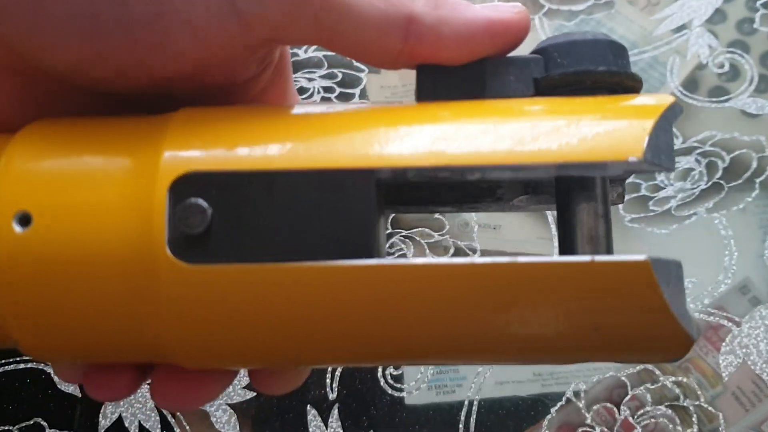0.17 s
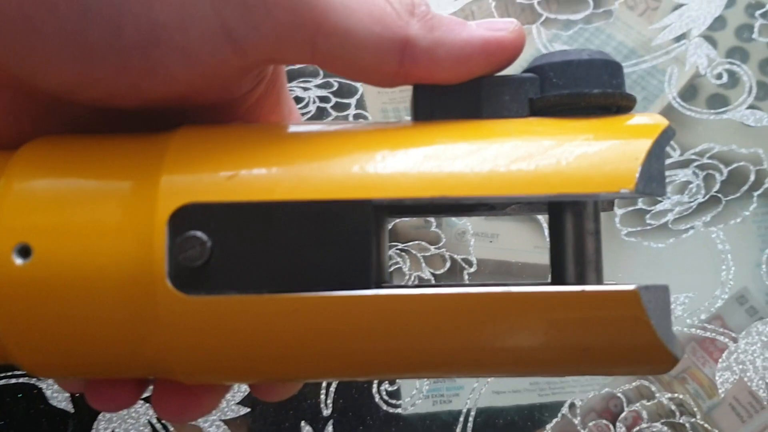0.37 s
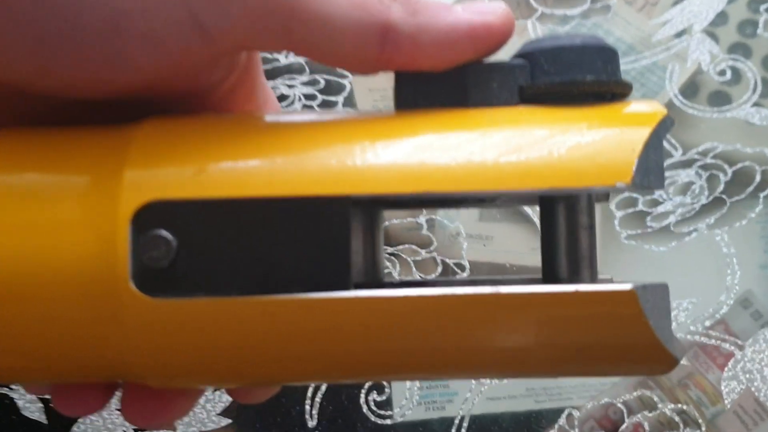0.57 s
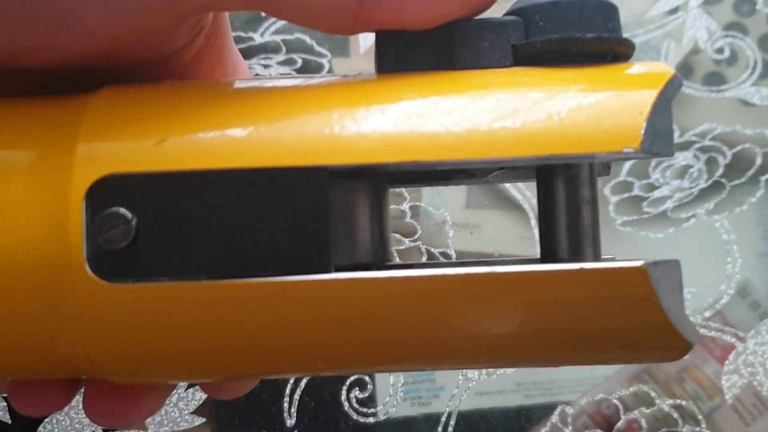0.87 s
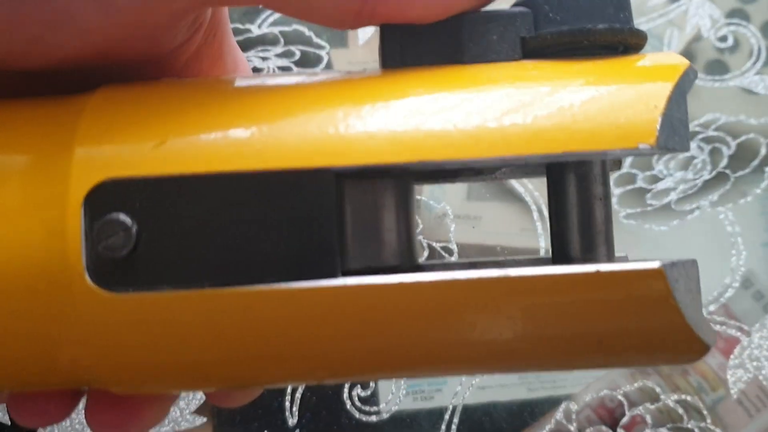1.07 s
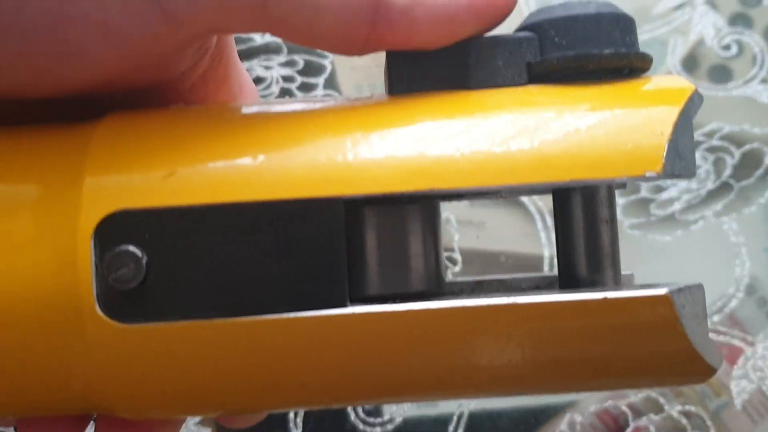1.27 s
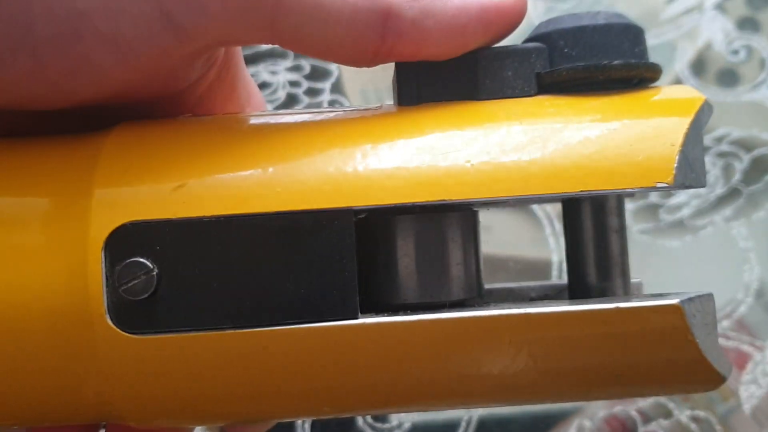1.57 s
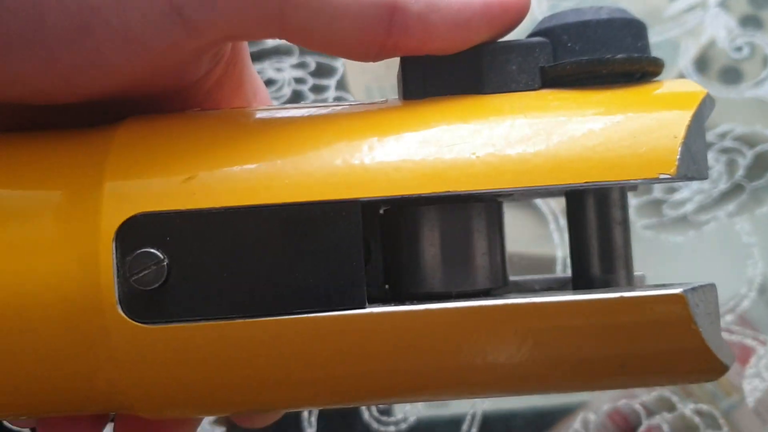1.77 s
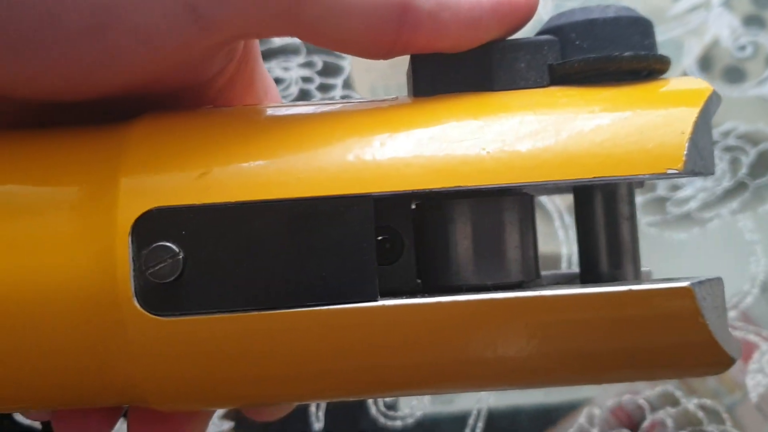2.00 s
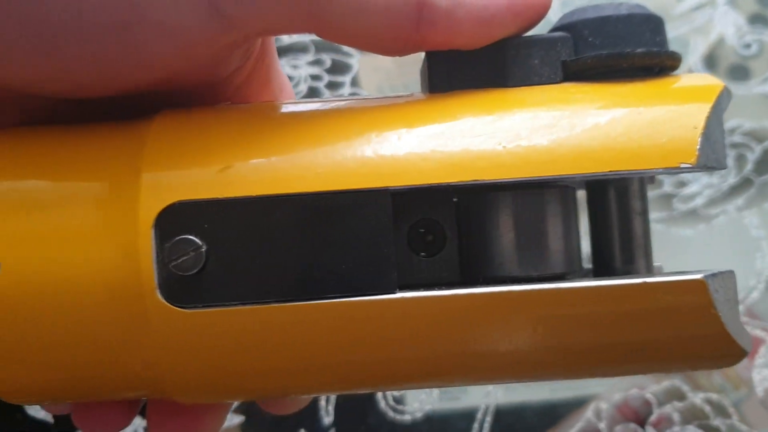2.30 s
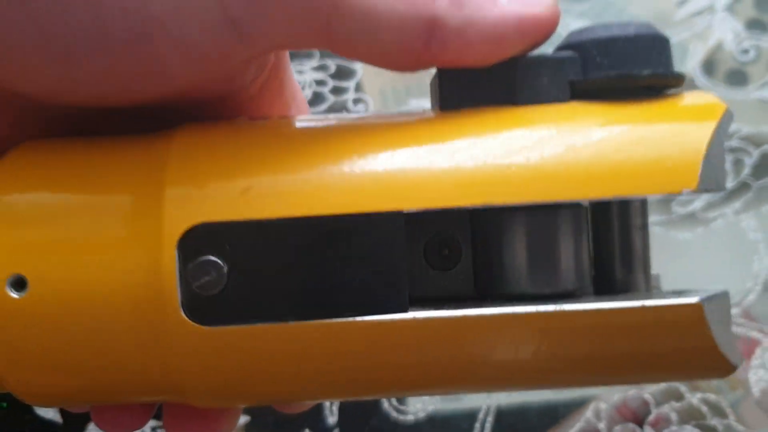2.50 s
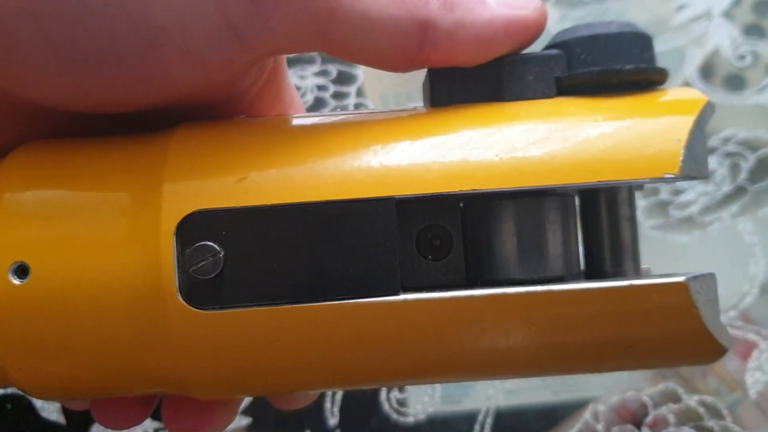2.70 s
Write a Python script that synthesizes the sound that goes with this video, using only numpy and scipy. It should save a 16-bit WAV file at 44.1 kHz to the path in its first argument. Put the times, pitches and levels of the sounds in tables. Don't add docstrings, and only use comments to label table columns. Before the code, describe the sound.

Close to the right microphone, a geared electric tool motor grinds up to speed and whines steadily over harsh rattle and fan hiss, then squeals down sharply; soft scraping and ticking follow. The left side is duller.

```python
import sys
import numpy as np
from scipy import signal
from scipy.fft import rfft, irfft, next_fast_len
from scipy.io import wavfile
from scipy.ndimage import uniform_filter1d, map_coordinates

SR = 44100
rng = np.random.default_rng(int(sys.argv[2]) if len(sys.argv) > 2 else 0)


def invert_db(x):
    u = np.asarray(x, float) / 20
    return 10 ** u


def wrap_up_sound(samples):
    columns = np.atleast_2d(samples).T
    tamed = np.clip(columns, -1, 1)
    steps = np.round(tamed * 32767).astype(np.int16)
    wavfile.write(sys.argv[1], SR, steps)


N = 125685

# (time [s], shaft rate [Hz])
SPIN_UP_HZ = [(.155, 20), (.24, 118), (.322, 207), (.386, 287), (.42, 306)]
RUNNING_HZ = [(.46, 329.5), (.5, 352), (.6, 379.5), (.74, 400), (.9, 414.5), (1.14, 432.5), (1.49, 443.6),
              (1.71, 452.7), (2.22, 463.3), (2.45, 469.3)]
BRAKING_HZ = [(2.462, 461), (2.48, 420.5), (2.51, 334), (2.549, 206.3), (2.599, 40.4)]
# (time [s], level [dB])
EFFORT_DB = [(.15, -87), (.165, -57), (.182, -65), (.187, -40), (.21, -26), (.225, -20), (.26, -18.5),
             (.5, -14), (1.5, -14), (2.47, -14.5), (2.51, -17), (2.55, -24.5), (2.58, -25), (2.597, -42),
             (2.63, -66)]
# (multiple of shaft [-], peak level [dB], resonance [Hz], width [Hz], level elsewhere [dB])
SHAFT_ORDERS = [(1, -44, 455, 60, -56), (22, -30, 7600, 220, -70), (2.545, -28, 815, 55, -42),
                (5.09, -23, 2370, 50, -40), (7.635, -18, 2370, 200, -60), (6.09, -34, 2400, 200, -48),
                (7, -34, 3200, 100, -46), (8, -31, 3700, 50, -42), (12, -30, 4400, 150, -48),
                (14, -34, 5800, 150, -48), (17, -31, 6500, 500, -46), (22, -27.5, 10050, 450, -35),
                (24, -37, 8800, 600, -42), (2.545, -36, 1000, 90, -70), (31, -38, 12700, 1100, -50)]
STEADY_HZ = (455, 1000, 2370, 7600, 8700, 10050)
# (time [s], level [dB])
START_SQUEAL_DB = [(.312, -45), (.328, -15), (.352, -11), (.386, -18), (.405, -22), (.42, -50)]
# (time [s], level [dB])
BRAKE_SQUEAL_DB = [(2.44, -50), (2.46, -19), (2.478, -18.5), (2.51, -14), (2.55, -23), (2.565, -61)]
BRAKE_OVERTONE_DB = [(2.538, -50), (2.549, -21), (2.558, -24), (2.567, -19), (2.576, -50)]
# (centre [Hz], width [Hz], level [dB])
HOUSING_MODES = [(1410, 87, -23), (2310, 260, -8.5), (3220, 263, -4), (3820, 32, -24), (4327, 120, -2.5),
                 (4844, 240, -7), (6030, 1040, -11), (6420, 140, -17), (7360, 110, -19.5)]
# (frequency [Hz], density [dB per Hz])
RATTLE_COLOUR = [(150, -70), (350, -51), (452, -36), (560, -21.5), (900, -10), (2310, -5), (6180, -6),
                 (9300, -18.5), (13000, -18)]
FAN_COLOUR = [(7000, -74), (9200, -9.5), (11500, -6), (13800, 4), (15800, -3)]
RUMBLE_COLOUR = [(18, -40), (30, -19), (70, -5), (140, -6.5), (300, -1), (500, 8.5), (800, -58)]
# (time [s], level [dB])
FAN_BRAKE_DB = [(2.47, 3), (2.55, 8), (2.59, -6)]
# (time [s], level [dB])
GRIND_DB = [(.152, -75), (.162, -55.5), (.185, -33.5), (.22, -30.5), (.25, -22.5), (.31, -24), (.35, -52),
            (.4, -80)]
# (centre [Hz], width [Hz], level [dB])
GRIND_MODES = [(860, 90, -7), (1350, 260, -6), (1950, 150, -5), (2230, 130, 2)]
# (time [s], level [dB])
THUMPS_DB = [(.188, -30), (.2, -27), (.213, -24), (.244, -10), (.263, -6), (.273, -9), (.286, -11),
             (.294, -13), (.303, -7), (.314, -14)]
# (centre [Hz], width [Hz], level [dB])
THUMP_MODES = [(1350, 250, -14), (2230, 110, 0), (2900, 250, -12)]
# (time [s], level [dB])
RETURN_DB = [(2.58, -80), (2.61, -34), (2.64, -31.5), (2.685, -28), (2.74, -29.5), (2.748, -35), (2.8, -37),
             (2.85, -38.5)]
# (frequency [Hz], density [dB per Hz])
RETURN_COLOUR = [(150, -40), (500, -21.5), (1300, -14), (2200, -1), (3700, -11), (6300, -7.5), (9300, -20),
                 (11000, -15.5), (15800, -8.5)]
# (start [s], end [s], from [Hz], to [Hz], level [dB])
WHINES = [(.208, .25, 4900, 8700, -29), (.218, .236, 6200, 6500, -24), (2.675, 2.88, 810, 670, -53),
          (2.655, 2.72, 1380, 1600, -42), (2.6, 2.81, 265, 235, -61), (2.505, 2.6, 880, 860, -37),
          (2.79, 2.9, 900, 900, -59), (2.63, 2.76, 2050, 2400, -39), (2.65, 2.73, 2700, 3250, -44),
          (.159, .172, 2900, 3050, -46), (2.66, 2.75, 4400, 4350, -41), (2.6, 2.66, 3000, 3200, -45)]
# (time [s], shaft rate [Hz])
KICK_HZ = [(2.6, 130), (2.615, 195), (2.635, 290), (2.66, 380), (2.69, 455), (2.72, 478), (2.745, 482)]
# (time [s], level [dB])
KICK_DB = [(2.605, -65), (2.62, -42), (2.655, -42), (2.69, -45), (2.742, -46), (2.747, -80)]
# (multiple of shaft [-], level [dB])
KICK_ORDERS = [(22, 0), (24, -3)]
# (time [s], level [dB])
CREEP_DB = [(2.74, -70), (2.752, -35), (2.8, -34.5), (2.85, -37.5)]
# (frequency [Hz], density [dB per Hz])
CREEP_COLOUR = [(500, -40), (2200, -6), (3700, -11), (6200, 0), (8000, -14), (10200, -28), (13500, -16),
                (15800, -17)]
# (time [s], level [dB])
RATCHET_DB = [(2.751, -29), (2.757, -28), (2.765, -27), (2.771, -29), (2.791, -26), (2.797, -27),
              (2.803, -26), (2.81, -26), (2.822, -28), (2.8313, -22)]
# (centre [Hz], width [Hz], level [dB])
PAWL_MODES = [(3200, 500, -12.5), (6200, 750, 0), (7400, 600, -8)]
# (time [s], level [dB], level of modes under 5 kHz [dB])
CLICKS = [
    (.0615, -48, 0),
    (.065, -38, -3),
    (.1535, -40, -14),
    (.156, -26, -16),
    (2.601, -32, -14),
]
# (frequency [Hz], level [dB], T60 [s])
TRIGGER_MODES = [(851, -11, .1), (2200, -3, .04), (4110, -15, .2), (6358, 0, .015), (12000, -2, .01),
                 (13800, -3, .01)]
# (frequency [Hz], gain [dB])
SHADE_DB = [(60, 0), (300, -3.5), (740, -11), (1220, -15), (2000, -22), (4500, -29), (9500, -17),
            (12500, -34)]
# (frequency [Hz], gain [dB])
DIFFUSE_DB = [(60, -5), (600, -10.5), (1220, -6.5), (2200, -22), (3600, -35), (4500, -29.5), (7000, -62),
              (10200, -9), (13000, -24)]
# (frequency [Hz], density [dB per Hz])
FLOOR_COLOUR = [(15, -32), (25, 7), (141, 6), (276, 4.5), (361, -14), (2260, -12), (8050, -43),
                (15800, -46)]
# (time [s], level [dB])
FLOOR_DUCK_DB = [(.15, 2.5), (.4, -2)]


def unit(x):
    return x / np.sqrt(np.mean(x ** 2) + 1e-20)


def along(points, hz):
    f, v = np.transpose(points)
    return np.interp(np.log(hz + 1), np.log(f + 1), v)


def curve(rows):
    return np.interp(np.arange(N) / SR, *np.transpose(rows))


def wobble(rate_hz):
    knots = rng.standard_normal(int(N * 200 / SR) + 4)
    return map_coordinates(knots, [np.arange(N) * min(rate_hz, 200) / SR])


def filtered(x, response):
    m = next_fast_len(N + 8192)
    return irfft(rfft(x, m) * response(np.fft.rfftfreq(m, 1 / SR)), m)[..., :N]


def coloured(x, spectrum):
    return unit(filtered(x, lambda hz: invert_db(along(spectrum, hz))))


def patchy(depth_db):
    z = signal.stft(rng.standard_normal(N), nperseg=256)[2]
    field = uniform_filter1d(rng.standard_normal(z.shape), 3, 0)
    field = uniform_filter1d(field, 6, 1)
    return unit(signal.istft(z * invert_db(depth_db * unit(field)), nperseg=256)[1][:N])


def rings(modes):
    return lambda f: sum(invert_db(db) * 1j * f * w / (c * c - f * f + 1j * f * w) for c, w, db in modes)


def struck(rows, modes):
    blows = np.zeros(N)
    s, db = np.transpose(rows)
    blows[np.round(s * SR).astype(int)] = invert_db(db)
    bank = rings(modes)
    impulse = irfft(bank(np.fft.rfftfreq(4096, 1 / SR)))
    return filtered(blows, bank) / np.abs(impulse).max()


def gear_drive():
    teeth_per_s, spread_db, tooth_share = 5000, 2, .4
    draw = rng.random((3, N))
    hit = draw[0] < teeth_per_s / SR
    teeth = hit * np.sign(draw[1] - .5) * invert_db(-spread_db * np.log(draw[2] + .01))
    return np.sqrt(tooth_share) * unit(teeth) + np.sqrt(1 - tooth_share) * patchy(1.5)


def housing_rattle(drive):
    shift, grip_hz, modes_db = .008, 25, 9
    bank = rings(HOUSING_MODES)
    low, high = (filtered(drive, lambda f: 1 + invert_db(modes_db) * bank(f * (1 + way * shift)))
                 for way in (1, -1))
    share = .5 + .5 * np.tanh(2 * wobble(grip_hz))
    return coloured(share * low + (1 - share) * high, RATTLE_COLOUR)


def fan_hiss(drive):
    level_db = -13 - 2.5 * np.arange(N) / N + curve(FAN_BRAKE_DB)
    return invert_db(level_db) * coloured(.5 * drive + patchy(2.9), [(5000, -120), *FAN_COLOUR])


def motor_rumble(shaft_hz):
    gain = invert_db(-30 + 1.14 * wobble(13.74)) * (shaft_hz / 450) ** 0.5
    return gain * coloured(rng.standard_normal(N), RUMBLE_COLOUR)


def spin_up_grind(drive):
    bank = rings(GRIND_MODES)
    ground = filtered(drive, lambda f: bank(f) * f ** 2 / (f ** 2 + 700 ** 2))
    return invert_db(curve(GRIND_DB) + 2.6 * wobble(98)) * unit(ground)


def rattle(angle, shaft_hz):
    pump_order, pump_db = .057, 0
    drive = gear_drive()
    running = housing_rattle(drive) + fan_hiss(drive) + motor_rumble(shaft_hz)
    effort_db = curve(EFFORT_DB) + pump_db * np.sin(pump_order * angle) + .32 * wobble(30.24)
    return invert_db(effort_db) * running + spin_up_grind(drive)


def order_tones(shaft_hz, angle):
    out = np.zeros(N)
    for k, db, best_hz, width_hz, off_db in SHAFT_ORDERS:
        gain = invert_db(off_db) + invert_db(db) * np.exp(-.5 * ((k * shaft_hz - best_hz) / width_hz) ** 2)
        steady = k != 6.09 and min(abs(best_hz / hz - 1) for hz in STEADY_HZ) < .06
        waver_db = (1 if steady else 3) * wobble(30)
        phase = k * angle + .29 * wobble(60) + 2 * np.pi * rng.random()
        out += gain * invert_db(waver_db) * np.sin(phase)
    driven_db = curve([(.27, -45), (.35, -0.5), (2.45, -0.5), (2.49, -6), (2.55, -56)])
    return np.sqrt(2) * invert_db(driven_db) * out


def squeals(angle):
    t = np.arange(N) / SR

    def gate(rows):
        return (t > rows[0][0]) & (t < rows[-1][0] + .015)

    beat_hz, beat_peak_s = 103.4, .332
    beat = 2.5 * np.abs(np.cos(np.pi * beat_hz * (t - beat_peak_s))) ** 2.32
    start = invert_db(curve(START_SQUEAL_DB)) * beat * np.sin(12.14 * angle + .82 * wobble(151.4))
    brake = invert_db(curve(BRAKE_SQUEAL_DB) + 1.67 * wobble(90)) * np.sin(8 * angle + 1.1 * wobble(150))
    brake += invert_db(curve(BRAKE_OVERTONE_DB)) * np.sin(15 * angle)
    return np.sqrt(2) * (start * gate(START_SQUEAL_DB) + brake * gate(BRAKE_SQUEAL_DB))


def passing_whines():
    out, t = np.zeros(N), np.arange(N) / SR
    for start_s, end_s, from_hz, to_hz, db in WHINES:
        u = np.clip((t - start_s) / (end_s - start_s), 0, 1)
        glide_hz = from_hz + (to_hz - from_hz) * u * (1.3 - .315 * u)
        hz = glide_hz * (1 + .012 * abs(to_hz / from_hz - 1) * wobble(200))
        gain = invert_db(db + 2.5 * wobble(120)) * np.sin(np.pi * u ** .55)
        out += gain * np.sqrt(2) * np.sin(2 * np.pi * np.cumsum(hz) / SR + .71 * wobble(80))
    return out


def ram_return():
    bank = rings(HOUSING_MODES)
    scrape = filtered(patchy(4), lambda f: 1 + invert_db(10) * bank(f))
    return invert_db(curve(RETURN_DB) + 2 * wobble(90)) * coloured(scrape, RETURN_COLOUR)


def motor_kick():
    angle = 2 * np.pi * np.cumsum(curve(KICK_HZ) * (1 + .018 * wobble(200))) / SR
    on = np.abs(np.arange(N) / SR - 2.675) < .075
    whir = sum(invert_db(db + 3.2 * wobble(150)) * np.sin(k * angle) for k, db in KICK_ORDERS)
    return np.sqrt(2) * on * invert_db(curve(KICK_DB)) * whir


def ram_home():
    slide = invert_db(curve(CREEP_DB) + 2.2 * wobble(150)) * coloured(patchy(3), CREEP_COLOUR)
    return slide + struck(RATCHET_DB, PAWL_MODES)


def clicks():
    attack_s, crack_t60_s, after_db, after_t60_s, highpass_hz = .00017, .0062, -29, .12, 800
    out, t = np.zeros(N + SR), np.arange(SR // 4) / SR
    for s, db, low_db in CLICKS:
        ring = np.zeros(len(t))
        for hz, level_db, t60_s in TRIGGER_MODES:
            mode_db = level_db + low_db * (hz < 5000) + rng.normal(0, 1.5)
            ring += invert_db(mode_db - 60 * t / t60_s) * np.sin(2 * np.pi * hz * t)
        decay = 1.3 * invert_db(-60 * t / crack_t60_s) + invert_db(after_db - 60 * t / after_t60_s)
        crack = decay * rng.standard_normal(len(t))
        out[round(s * SR):][:len(t)] += invert_db(db - 4) * (ring + crack) * (1 - np.exp(-t / attack_s))
    return filtered(out[:N], lambda hz: hz ** 4 / (hz ** 4 + highpass_hz ** 4))


def room(x):
    t60_s, gap_s = .17, .002
    t = np.arange(SR // 3) / SR
    tail = rng.standard_normal((2, len(t))) * invert_db(-60 * t / t60_s) * (t > gap_s)
    return signal.fftconvolve(x[None], tail / np.linalg.norm(tail[0]), axes=1)[:, :N]


def room_floor():
    a, b = (coloured(rng.standard_normal(N), FLOOR_COLOUR) for _ in range(2))
    return invert_db(-70.5 + curve(FLOOR_DUCK_DB)) * np.array([a + .65 * b, a - .68 * b])


def scene():
    shaft_hz = curve([*SPIN_UP_HZ, *RUNNING_HZ, *BRAKING_HZ])
    angle = 2 * np.pi * np.cumsum(shaft_hz) / SR
    tool = rattle(angle, shaft_hz) + order_tones(shaft_hz, angle) + squeals(angle)
    tool += struck(THUMPS_DB, THUMP_MODES) + passing_whines() + ram_return()
    tool += motor_kick() + ram_home() + clicks()
    wet = room(tool)
    lag_s = 4.45 / SR
    shaded = filtered(tool, lambda hz: invert_db(along(SHADE_DB, hz)) * np.exp(-2j * np.pi * hz * lag_s))
    left = shaded + filtered(wet[0], lambda hz: invert_db(along(DIFFUSE_DB, hz)))
    right = tool + invert_db(-11.5) * wet[1]
    return np.array([left, right]) + room_floor()


def band_limit(x):
    return signal.sosfilt(signal.butter(12, 16910, fs=SR, output="sos"), x)


def record(dry):
    top_hz, notch_hz, notch_width_hz, notch_depth = 15750, 9250, 400, .45
    limited = .9 * 1.5 * np.tanh(dry / 1.5)

    def port(hz):
        notch = 1 - notch_depth * np.exp(-((hz - notch_hz) / notch_width_hz) ** 2)
        return (hz < top_hz) * notch

    mix = filtered(limited, port)
    return band_limit(mix)


dry = scene()
out = record(dry)
wrap_up_sound(out)
```